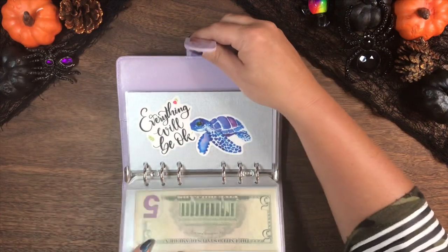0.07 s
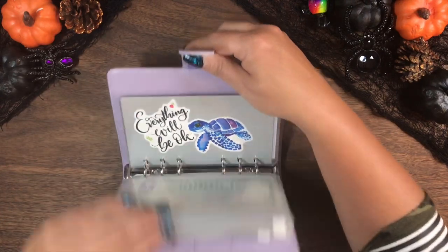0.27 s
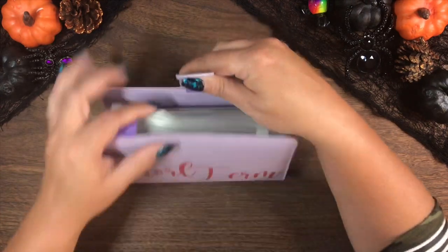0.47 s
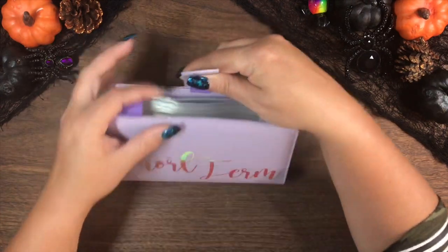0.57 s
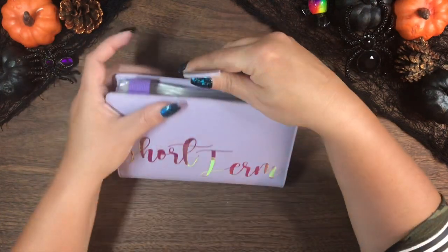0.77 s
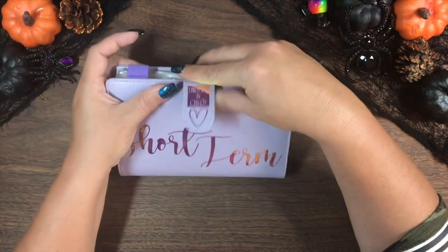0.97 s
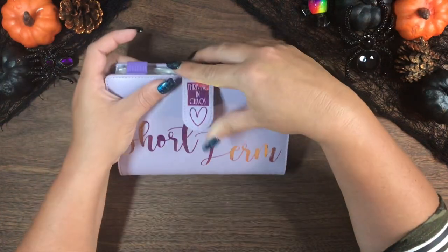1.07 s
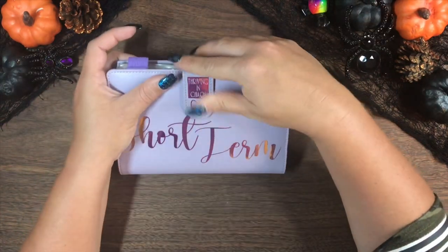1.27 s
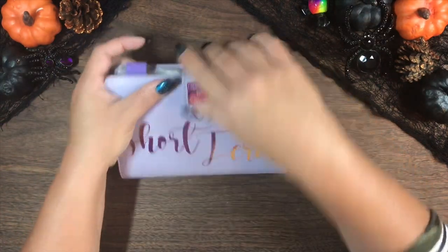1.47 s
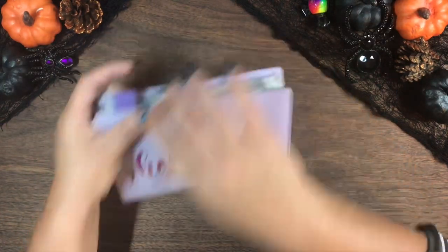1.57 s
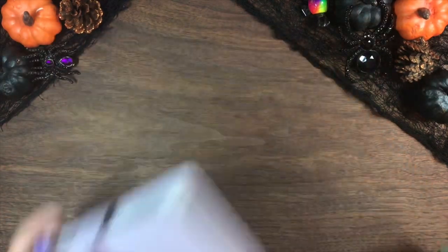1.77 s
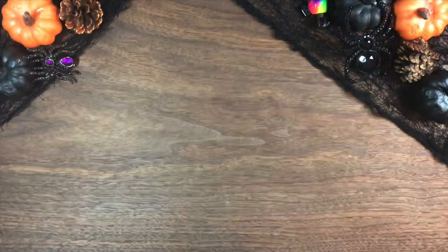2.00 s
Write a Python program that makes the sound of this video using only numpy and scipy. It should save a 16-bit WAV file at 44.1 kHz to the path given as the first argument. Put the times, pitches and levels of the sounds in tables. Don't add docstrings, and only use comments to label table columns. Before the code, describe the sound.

One crisp snap of a small binder's strap, with faint handling rustle in a quiet room

```python
import sys
import numpy as np
from scipy import signal
from scipy.io import wavfile

SR = 44100
rng = np.random.default_rng(int(sys.argv[2]) if len(sys.argv) > 2 else 0)


def to_wav(sig):
    pcm = np.clip(np.atleast_2d(sig), -1, 1) * 32767
    pcm = np.round(pcm).astype(np.int16)
    wavfile.write(sys.argv[1], SR, pcm.T)


def ratio(d):
    e = np.asarray(d, float) / 20
    return 10 ** e


N = 89787
RADIATES_ABOVE_HZ = 100


def rms_one(x):
    return x / np.sqrt(np.mean(x ** 2) + 1e-20)


def at_hz(points, hz):
    table = np.array(points)
    return np.interp(np.log(hz), np.log(table[:, 0]), table[:, 1])


def drift(rate):
    r = np.exp(-80 * np.pi * rate / SR)
    white = rng.standard_normal(N // 40 + 2002)
    slow = signal.lfilter([1], [1, -2 * r, r * r], white)[2000:]
    return np.interp(np.arange(N) / 40, np.arange(len(slow)), rms_one(slow))


def resonance(x, hz, width_hz):
    r = np.exp(-np.pi * width_hz / SR)
    return signal.lfilter([1, 0, -1], [1, -2 * r * np.cos(2 * np.pi * hz / SR), r * r], x)


def bands(spectrum):
    edges = 22 * 2 ** np.arange(0, 9.6, .5)
    white = rng.standard_normal((2, N))
    hz = np.sqrt(edges[1:] * edges[:-1])
    out = []
    for k in range(len(hz)):
        sos = signal.butter(2, edges[k:k + 2], "band", fs=SR, output="sos")
        out.append(signal.sosfilt(sos, white[k % 2]))
    out = np.array(out) * ratio(at_hz(spectrum, hz))[:, None]
    return hz, out / np.sqrt(np.mean(out.sum(0) ** 2))


# (frequency [Hz], density [dB per Hz])
AIR_SPECTRUM = [(15, -41), (25, -15), (127, -3.5), (185, -6.5), (714, -18.5), (1040, -0.5), (1260, -33),
                (1700, -16.5), (16000, -32)]


def room_air():
    level_db = -66.5
    return ratio(level_db) * bands(AIR_SPECTRUM)[1].sum(0)


# (time [s], level [dB])
RUB_PRESSURE = [(0, -65), (.1, -63.5), (.18, -57), (.3, -61), (.45, -62.5), (.58, -68.5), (.68, -64.5),
                (.78, -66), (0.879, -61.5), (1.0, -72), (1.25, -78), (1.36, -70), (1.401, -60.5),
                (1.56, -68.5), (1.681, -67.5), (1.73, -59), (1.87, -59), (2.036, -56.5)]
# (frequency [Hz], density [dB per Hz])
RUB_COLOUR = [(180, -25.5), (300, -8), (870, -8.5), (1780, -4.5), (2320, -5), (4440, -3), (5430, -8.5),
              (12100, -10), (16000, -24.5)]


def rub():
    hz, noise = bands(RUB_COLOUR)
    together = drift(9)
    patches = np.array([ratio(1.9 * together + 2.2 * drift(10)) for _ in hz])
    whisper_gain = ratio(-9.5 + 3.6 * drift(11))
    whisper = whisper_gain * rms_one(resonance(rng.standard_normal(N), 4400, 410))
    s, db = np.transpose(RUB_PRESSURE)
    pressure = ratio(np.interp(np.arange(N) / SR, s, db))
    return pressure * ((noise * patches).sum(0) + whisper)


# (time [s], peak level [dB], pitch [Hz], t60 [s])
TICKS = [(.036, -50, 1050, 0.034), (0.058, -46, 7000, 0.009), (.116, -49.5, 704, 0.0087),
         (.304, -40, 9000, 0.0046), (.326, -46.5, 686, 0.038), (.332, -39.5, 4940, 0.0032),
         (.334, -41, 1940, 0.012), (.337, -51, 9000, .006), (.342, -36, 4900, .008),
         (.349, -31, 3930, 0.011), (0.383, -51, 9000, 0.0042), (.391, -41.5, 3450, 0.0081),
         (.400, -45, 4450, 0.011), (.409, -51, 4960, 0.005), (0.426, -44, 980, 0.026),
         (.628, -53, 2000, 0.0069), (.670, -51, 770, 0.027), (.961, -48, 280, 0.091),
         (1.407, -52, 1800, 0.022), (1.701, -36.5, 6000, .02), (1.702, -47, 790, 0.046),
         (1.708, -31.5, 7000, .008), (1.761, -45, 8000, 0.023), (1.769, -33, 7400, .015),
         (1.826, -46.5, 1200, 0.036), (1.831, -36.5, 6000, 0.023), (1.917, -50.5, 413, 0.021),
         (1.957, -45.5, 890, .03)]


def ticks():
    q, edge_db = 1.98, -28
    out = np.zeros(N)
    chance = rng.standard_normal((len(TICKS), 2048))
    t = np.arange(chance.shape[1]) / SR
    for (s, db, hz, t60), c in zip(TICKS, chance):
        burst = (c + 2.4 * (t == 0)) * ratio(-60 * t / t60)
        body = resonance(burst, hz, hz / q)
        edge = ratio(edge_db - hz ** -.5 * 900) * burst / 2
        start = int(s * SR)
        out[start:start + len(t)] += ratio(db) * (body / np.abs(body).max() + edge)
    return out


SCUFF_STARTS = [.168, .324, .360, .33, .42, 1.684, 1.711, 1.823, 1.7, 1.89, 2.002, .975]
# (length [s], level [dB], centre [Hz], width [Hz])
SCUFF_STROKES = [(0.027, -54, 4150, 710), (0.081, -54, 1300, 7500), (0.015, -43, 2020, 1700),
                 (0.15, -59.5, 43, 167), (0.35, -66.5, 110, 600), (0.078, -52.5, 4900, 12000),
                 (0.013, -39.5, 4100, 5500), (0.041, -50.5, 3700, 2600), (0.046, -71, 34, 60),
                 (0.046, -63, 154, 64), (0.067, -54, 1880, 190), (0.03, -65, 9300, 9000)]


def scuffs():
    out, t = np.zeros(N), np.arange(N) / SR
    for s, (length, db, hz, width_hz) in zip(SCUFF_STARTS, SCUFF_STROKES):
        grains = rng.standard_normal(N) * ratio(2.0 * drift(220))
        pole_width = 1.33 * width_hz
        tone = resonance(resonance(grains, hz, pole_width), hz, pole_width)
        u = np.clip((t - s) / length, 0, 1)
        out += ratio(db) * rms_one(tone) * np.sin(np.pi * u ** 0.42)
    return out


def ring(force, hz, t60):
    r, w = ratio(-60 / (t60 * SR)), 2 * np.pi * hz / SR
    return signal.lfilter([0, np.sin(w)], [1, -2 * r * np.cos(w), r * r], force + 1e-18)


def strike(blows, modes, damping):
    force = np.zeros(N)
    for s, db, cut_hz in blows:
        decay, i = np.exp(-2 * np.pi * cut_hz / SR), round(s * SR)
        force[i:] += ratio(db) * (1 - decay) * decay ** np.arange(N - i)
    out = np.zeros(N)
    for k, (hz, db, t60) in enumerate(modes):
        out = out + ratio(db) * (-1) ** k * ring(force, hz, t60 * damping)
    return out


# (time [s], impulse [dB], hardness as cut-off [Hz])
CONTACTS = [
    (1.02309, 31, 25),
    (1.02318, -1, 24000),
    (1.02371, -4.5, 38000),
    (1.02531, -19, 40000),
    (1.02809, -15, 900),
]
# (time [s], impulse [dB], hardness as cut-off [Hz])
TOUCHES = [
    (1.1405, -30.5, 6000),
    (1.1425, -39, 4000),
    (1.3414, -25, 20000),
    (1.3420, -24, 14000),
    (1.3429, -29.5, 5000),
    (1.3517, -29, 1200),
]
# (frequency [Hz], level [dB], t60 [s])
CLASP = [(270, -34.5, .024), (700, -24, .035), (945, -12, .023), (1490, -6.5, .0035), (1860, -21.5, .015),
         (2160, -15.5, .012), (2670, -9, .0173), (3030, -10, .017), (3350, -11, .0083), (4620, -16, .016),
         (6100, -13, .0028), (6700, -18, .012), (8850, -30, .005), (12270, -22, .004)]
# (frequency [Hz], level [dB], t60 [s])
SHELL = [(128, -51.5, 0.18), (225, -46, .1), (315, -43, .1), (480, -45, .08), (965, -36, .15),
         (1017, -43, 0.15), (1305, -44, 0.12), (1424, -29.5, .07), (2334, -35.5, 0.2), (2520, -33, 0.077),
         (3725, -46, .08)]


def snap():
    closing = strike(CONTACTS, CLASP, 1)
    touched = strike(TOUCHES, CLASP, 0.26)
    shell = strike(CONTACTS[2:3], SHELL, 0.98)
    sos = signal.butter(3, RADIATES_ABOVE_HZ, "high", fs=SR, output="sos")
    return signal.sosfilt(sos, closing + touched + shell)


# (frequency [Hz], density [dB per Hz])
ECHO_SPECTRUM = [(59, -31), (100, -3.5), (434, -10.5), (904, -12), (1920, -11), (2370, -11), (2920, -8.5),
                 (4640, -15.5), (15000, -41)]
# (frequency [Hz], t60 [s])
ECHO_T60 = [(150, 0.16), (1000, 0.32), (3000, 0.27), (12000, 0.033)]
# (frequency [Hz], width [Hz], level [dB], t60 [s])
HOLLOW = [
    (950, 140, -38.5, 0.19),
    (2240, 150, -35.5, 0.17),
    (1417, 150, -44, 0.26),
]


def echo():
    late_db, early_db, early_t60_s, rise_s = -39.5, -30.5, 0.07, 0.0017
    crack_db, crack_t60_s = -25, .012
    t = np.maximum(np.arange(N) / SR - CONTACTS[1][0], 0)
    hz, noise = bands(ECHO_SPECTRUM)
    late = ratio(late_db - 60 * t / at_hz(ECHO_T60, hz)[:, None])
    early = ratio(early_db - 60 * t / early_t60_s)
    reflected = (noise * (late + early))[hz > RADIATES_ABOVE_HZ].sum(0)
    white = rng.standard_normal(N)
    crack = rms_one(resonance(white, 6000, 5000)) * ratio(crack_db - 60 * t / crack_t60_s) * (t > 0)
    hollow = np.zeros(N)
    for f, width_hz, db, t60 in HOLLOW:
        hollow += rms_one(resonance(white, f, width_hz)) * ratio(db - 60 * t / t60)
    return (reflected + hollow) * np.minimum(t / rise_s, 1) + crack


def scene():
    return (room_air() + rub() + ticks() + scuffs() + snap() + echo())[None]


def low_pass(x):
    return signal.sosfilt(signal.butter(12, 16810, fs=SR, output="sos"), x)


def record(dry):
    dip_s, fade_out_s, fade_in_s = 1.987, 0.042, .03
    t = np.arange(N) / SR - dip_s
    fade = np.clip(np.where(t < 0, -t / fade_out_s, t / fade_in_s), .03, 1)
    sos = signal.cheby2(12, 70, 17100, fs=SR, output="sos")
    mix = signal.sosfilt(sos, dry * fade)
    return low_pass(mix)


dry = scene()
out = record(dry)
to_wav(out)
```